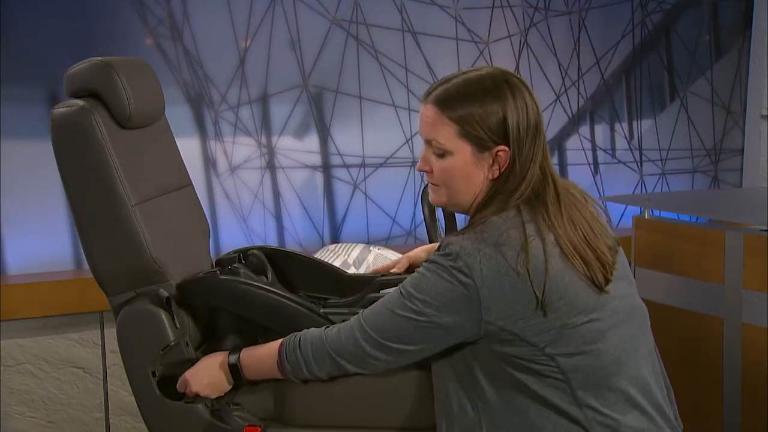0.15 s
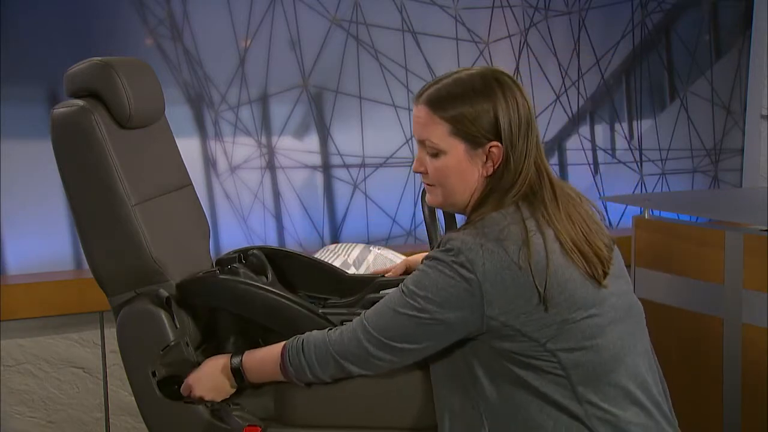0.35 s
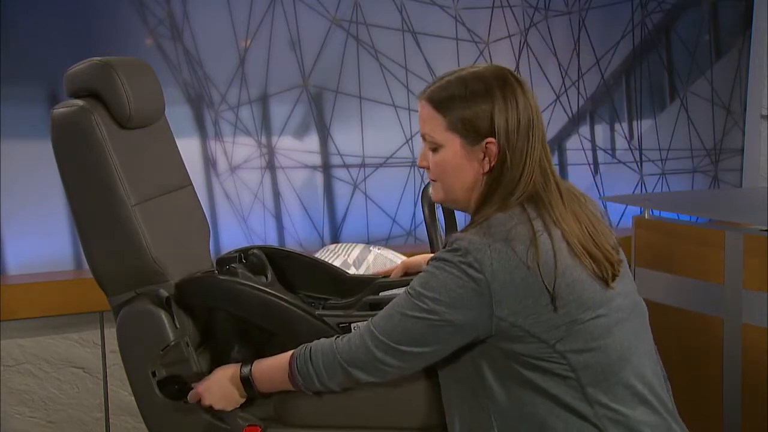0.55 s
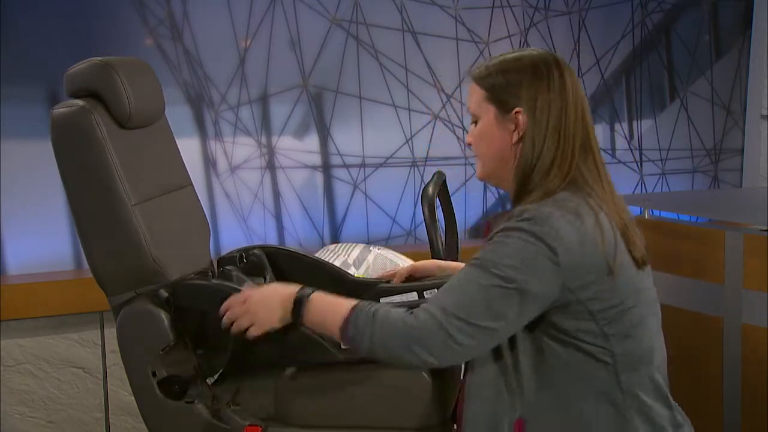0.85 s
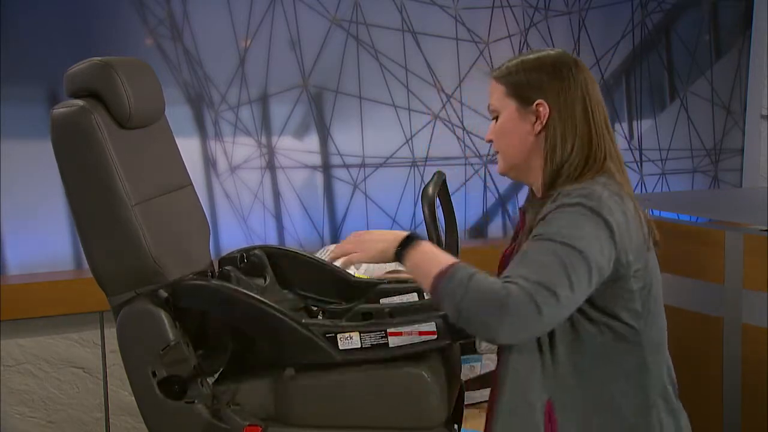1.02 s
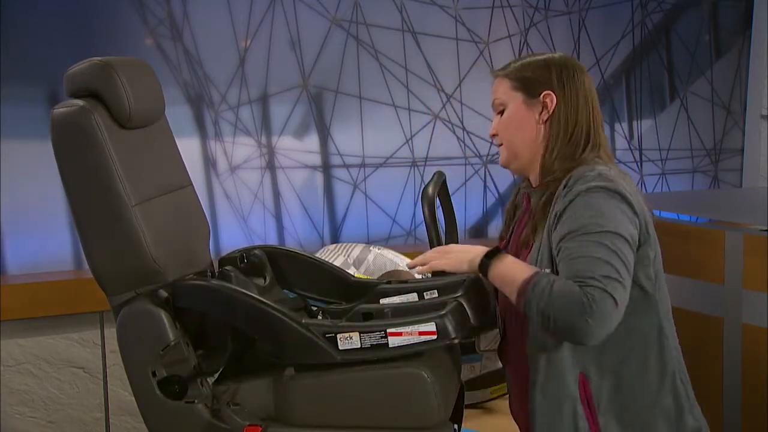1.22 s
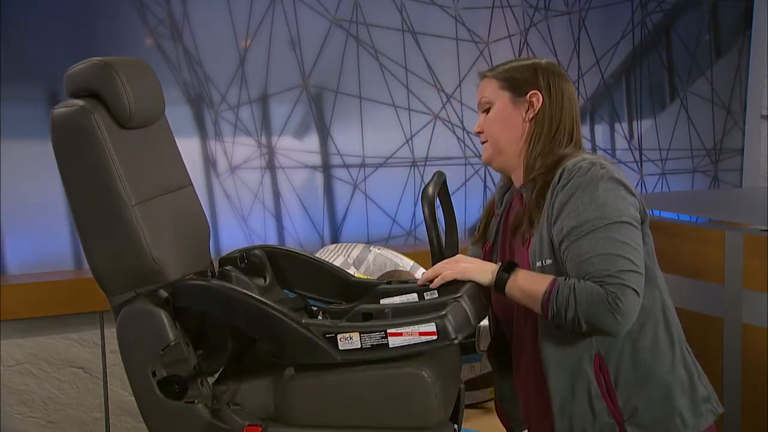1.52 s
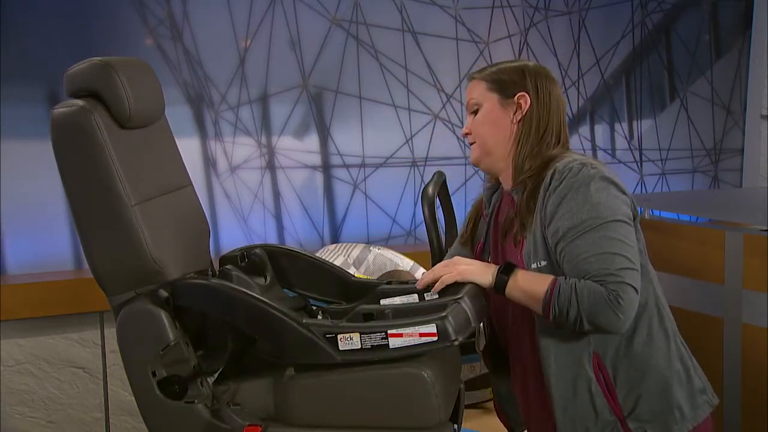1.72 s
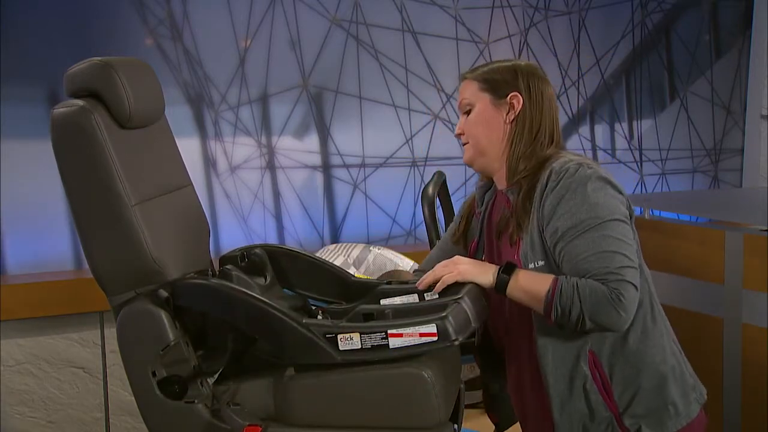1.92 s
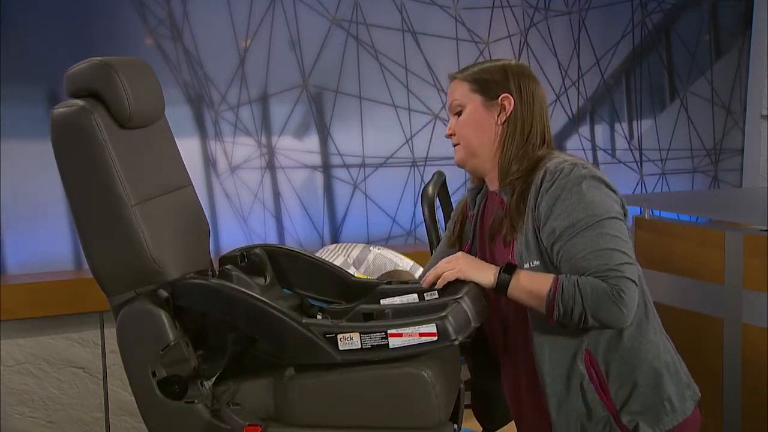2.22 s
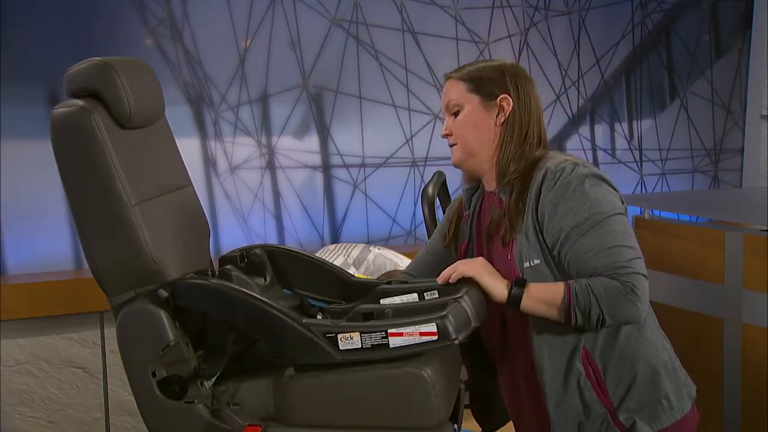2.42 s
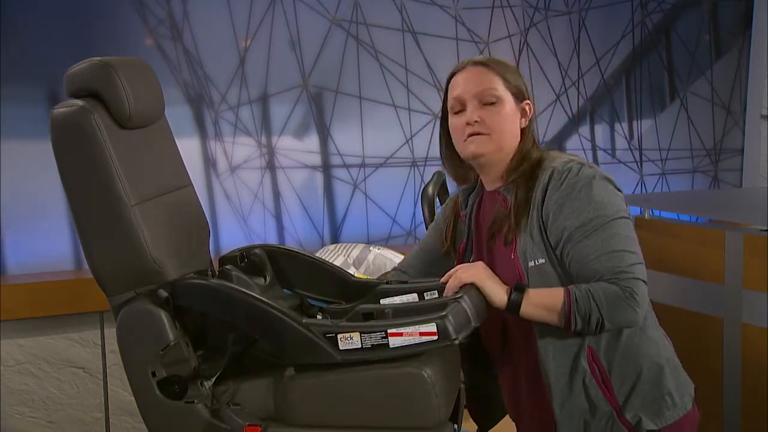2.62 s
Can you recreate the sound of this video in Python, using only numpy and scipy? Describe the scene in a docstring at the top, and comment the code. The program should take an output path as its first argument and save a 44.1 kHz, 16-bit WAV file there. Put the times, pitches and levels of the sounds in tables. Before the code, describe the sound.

A plastic child seat base knocks and clicks while being fitted. Its metal connector scrapes and rattles, then snaps on sharply at 0.4 seconds. A thump and a sleeve rubbing upholstery follow until about 1 second. After a lull, hollow knocks cluster from 1.5 to 1.9 seconds, with a strong one at 2.3. A springy latch clacks twice around 2.5 seconds. Faint ventilation hums in the quiet room.

```python
"""Fitting a child seat base

In a quiet studio a steel connector scrapes into a car seat and snaps onto its anchor, a sleeve
brushes the upholstery, the hollow plastic base knocks as it is shifted, and a sprung latch clacks
twice. Struck parts ring in damped normal modes, sliding friction gives noise, and the room adds
diffuse reverberation, ventilation and a faint hum."""
import sys
import numpy as np
from scipy import signal
from scipy.fft import rfft, irfft
from scipy.io import wavfile
from scipy.ndimage import uniform_filter1d

SR = 44100
rng = np.random.default_rng(int(sys.argv[2]) if len(sys.argv) > 2 else 0)


def wrap_up_sound(samples):
    """Save the sound to the file named by the first command line argument, as 16-bit audio."""
    columns = np.atleast_2d(samples).T
    # keep every value between -1 and 1, then stretch to whole-number steps
    tamed = np.clip(columns, -1, 1)
    steps = np.round(tamed * 32767).astype(np.int16)
    wavfile.write(sys.argv[1], SR, steps)


N = 121275
TIME = np.arange(N) / SR
RING_TIME = TIME[:SR // 2]

# Strokes of the sleeve. Each row: start and end in seconds, first and last level in dB.
SLEEVE_STROKES = [(-.02, 0.112, -36.5, -39.5), (0.537, 0.733, -55, -43), (0.737, 0.804, -44, -38.5),
                  (0.812, 0.902, -39, -42.5), (1.193, 1.401, -63, -52.5), (1.406, 1.508, -60.5, -65.5),
                  (1.569, 1.651, -45, -63), (1.678, 2.035, -59, -60.5), (2.047, 2.062, -56, -49),
                  (2.276, 2.295, -41, -52.5), (2.566, 2.748, -54.5, -54)]
# Envelopes of the sliding contacts. Each row: time in seconds, level in dB.
DRAG_ENVELOPE = [(0, -34.5), (.08, -32.5), (.125, -36.5), (.145, -40), (.19, -50), (.24, -62), (.32, -50),
                 (.365, -40), (.41, -51), (.45, -72)]
RUB_ENVELOPE = [(.5, -64), (.55, -54.5), (.62, -47.5), (.72, -45), (.82, -37), (.915, -45.5), (.95, -38.5),
                (.985, -65), (1.1, -95.5)]
SHUFFLE_ENVELOPE = [(1.02, -67.5), (1.27, -65), (1.42, -56.5), (1.54, -66), (1.58, -37), (1.645, -57.5),
                    (1.72, -41), (1.86, -56), (1.99, -46.5), (2.08, -51.5), (2.13, -67), (2.25, -87),
                    (2.29, -53), (2.42, -59), (2.49, -38), (2.61, -43.5), (2.75, -60)]
# Judders of the connector in the seat gap. Each row: start in seconds, level in dB.
SLIPS = [(0.05, -28.5), (0.064, -31), (0.075, -23.5), (.094, -24), (.114, -29.5)]
# Knocks heard from the base; the one at 1.694 s is the floor or wall echo of the knock just before.
# Each row: start in seconds, thud level in dB and pitch in Hz, panel level in dB and pitch in Hz,
# crack level in dB.
KNOCKS = [(0.0396, -21, 289, -19, 613, -24.5), (0.173, -34, 260, -34, 770, -40.5),
          (.192, -54, 270, -41, 810, -51), (0.2645, -33, 267, -33, 675, -48.5),
          (.283, -34.5, 297, -38.5, 900, -41.5), (0.304, -39, 268, -33.5, 625, -61),
          (.334, -31.5, 245, -28, 694, -39.5), (0.354, -44, 265, -32.5, 1040, -39.5),
          (.6775, -11, 275, -16, 850, -29), (0.742, -25, 290, -50, 910, -31),
          (0.847, -18.5, 166, -28.5, 710, -38.5), (1.382, -28, 210, -45, 716, -56),
          (1.461, -36.5, 284, -39, 790, -51.5), (1.567, -17.5, 209, -29, 660, -49.5),
          (1.592, -24, 201, -31, 635, -52), (1.666, -15.5, 243, -22, 624, -20),
          (1.6696, -8.5, 240, -11.5, 646, -49), (1.694, -17.5, 240, -26, 584, -35),
          (1.756, -26, 267, -28, 630, -51), (1.784, -17.5, 257, -23.5, 694, -41.5),
          (1.8944, -8.5, 273.6, -18, 910, -33), (1.8982, -19.5, 278, -22, 630, -44),
          (2.169, -60, 280, -41, 613, -56.5), (2.2753, -32, 246, -33, 690, -41),
          (2.3115, -10.5, 265, -3, 786, -30.5), (2.4641, -20.5, 243, -16.5, 817, -27),
          (2.4743, -17.5, 227, -18, 704, -45)]
# Impacts of the connector and of the latch. Each row: start in seconds, levels of body, metal ring
# and crack in dB, cutoff of the crack in Hz, level of the push into the cushion in dB.
CONNECTOR_SNAPS = [(.4062, -28.5, -42, -15, 3800, -50), (.4133, -15, -29, -10.5, 15000, -17),
                   (.6545, -37, -67, -28.5, 11000, -53)]
LATCH_CLACKS = [(2.458, -33, -30.5, -25, 15300, -33), (2.5378, -32.5, -22, -19, 11700, -25)]

# Modes of the hollow base and its stiff panels. Each row: pitch ratio, level in dB, T60 in seconds.
THUD_MODES = [(1, 0, .031), (1.62, -11, .022)]
PANEL_MODES = [(.62, -3, 0.0038), (.83, 6.5, 0.0065), (1, 6, 0.011), (1.54, -11.5, 0.024),
               (2.1, -8.5, 0.0046), (2.7, -36, 0.016)]
# Modes of the connector and latch parts. Each row: frequency in Hz, level in dB, T60 in seconds.
SLIP_MODES = [(1290, 2, 0.035), (2470, -7, 0.035)]
HOUSING_MODES = [(283, 4.5, 0.0034), (550, 5.5, 0.011), (760, 4.5, 0.01), (1530, -1.5, 0.016),
                 (3030, -8.5, 0.018), (3540, -7.5, 0.033), (4000, -2, 0.034)]
STEEL_MODES = [(4095, -15, .28), (7850, -14, .3), (8950, -13, .33), (10680, -15, .15), (13650, -12, .13),
               (14100, -6, .16), (14520, -5, .17), (14950, -6, .18)]
LEVER_MODES = [(1203, 5, 0.094), (1450, -2.5, 0.25), (1520, 2, 0.21), (1690, -6, 0.11), (3150, -18, 0.12),
               (4100, -11, 0.06), (6900, -6, .05)]
SPRING_MODES = [(7854, -11, .13), (7975, -5, .09), (8790, -17, .05), (11400, -16, .07), (13450, -14, .05)]

# Spectra of the noises and the reverberation. Each row: frequency in Hz, relative level in dB.
AIR_SPECTRUM = [(20, -22.5), (63, -6), (106, -3), (184, -10), (347, -23), (444, -12.5), (520, -40),
                (1580, -33.5), (11000, -39.5), (16000, -54)]
CLOTH_SPECTRUM = [(50, 19), (300, 12), (900, 2.5), (2000, 6), (4000, 2.5), (7000, 0.5), (11500, -1.5),
                  (16000, -7.5)]
DRAG_SPECTRUM = [(30, -8.5), (130, 0.5), (300, -7.5), (700, -3.5), (1000, -10.5), (1800, -15),
                 (3500, -28.5), (7000, -34.5), (16000, -40)]
RUB_SPECTRUM = [(50, -42), (180, -5), (550, 0.5), (900, 4.5), (1500, -3.5), (3500, -20.5), (12000, -25)]
SHUFFLE_SPECTRUM = [(40, -20.5), (140, -0.5), (260, -7.5), (480, -6), (720, -8.5), (1300, -15.5),
                    (3000, -29.5), (12000, -40.5)]
PLASTIC_SPECTRUM = [(300, -8.5), (1100, 1.5), (1900, 4), (3300, -8), (4400, -5.5), (6000, -15),
                    (11000, -19.5), (16000, -32.5)]
SNAP_SPECTRUM = [(300, -3), (1600, -3), (3500, -3.5), (6000, -13), (8000, -2.5), (11000, -6), (14500, -2.5),
                 (16000, 3)]
LATCH_SPECTRUM = [(200, -8), (1400, 6), (3500, 2.5), (5500, -4), (8000, -1), (10000, -11), (13500, -5),
                  (16000, -18)]
ROOM_SPECTRUM = [(60, -7), (270, -13), (800, -16), (1150, -15.5), (2000, -13.5), (5000, -12),
                 (14000, -10.5)]
# Reverberation time of the studio. Each row: frequency in Hz, T60 in seconds.
ROOM_T60 = [(150, .42), (400, .35), (1000, .36), (3000, .42), (8000, .38), (15000, .28)]


def from_db(db):
    """Amplitude grows tenfold for every 20 dB."""
    return 10 ** (np.asarray(db) / 20)


def unit_rms(x):
    """Normalisation to unit mean power."""
    return x / np.sqrt(np.mean(x ** 2) + 1e-20)


def at_hz(points, hz):
    """Interpolation on a logarithmic frequency axis."""
    freqs, values = np.transpose(points)
    return np.interp(np.log(np.maximum(hz, 1)), np.log(freqs), values)


def envelope(points):
    """Gain over time, linear in dB between points."""
    return from_db(np.interp(TIME, *np.transpose(points)))


def filtered(x, kind, hz):
    """A Butterworth filter with skirts of 12 dB per octave."""
    return signal.sosfilt(signal.butter(2, hz, kind, fs=SR, output="sos"), x)


def noise(spectrum, size=N):
    """Spectral shaping colours white noise; the result has unit rms."""
    gain = from_db(at_hz(spectrum, np.fft.rfftfreq(size, 1 / SR)))
    return unit_rms(irfft(rfft(rng.standard_normal(size)) * gain, size))


def add(out, start, sound):
    """Superposition: a sound joins the mix at its start in seconds."""
    i = max(0, int(start * SR))
    out[i:i + len(sound)] += sound[:N - i]


def ventilation():
    """Steady broadband air noise lies under a pure-tone hum."""
    hum_hz = 124.5
    return from_db(-56.5) * noise(AIR_SPECTRUM) + from_db(-64.5) * np.sin(2 * np.pi * hum_hz * TIME)


def grain(depth_db=1.5, grain_s=0.0011):
    """Friction is uneven, so its amplitude flutters at random."""
    flutter = uniform_filter1d(rng.standard_normal(N), int(grain_s * SR))
    return from_db(depth_db * unit_rms(flutter))


def sleeve_brushes(attack_s=0.0026, release_s=0.012):
    """Friction of fabric on fabric gives bright noise for the length of each stroke."""
    strokes = np.zeros(N)
    for start, end, first_db, last_db in SLEEVE_STROKES:
        attack = np.clip((TIME - start) / attack_s, 0, 1)
        release = np.exp(-np.maximum(TIME - end, 0) / release_s)
        strokes += attack * release * envelope([(start, first_db), (end, last_db)])
    return strokes * noise(CLOTH_SPECTRUM) * grain()


def connector_drag():
    """Sliding friction in the seat gap gives a low scraping noise."""
    return envelope(DRAG_ENVELOPE) * noise(DRAG_SPECTRUM)


def ring(modes, pitch=1, bend=0, relax_s=0.0028):
    """Free vibration is a sum of damped modes; a pressed shell starts sharp by the fraction bend."""
    t = RING_TIME
    bent_time = t + bend * relax_s * (1 - np.exp(-t / relax_s))
    return sum((-1) ** k * from_db(db - 60 * t / t60) * np.sin(2 * np.pi * hz * pitch * bent_time)
               for k, (hz, db, t60) in enumerate(modes))


def crack(spectrum, t60):
    """A hard contact excites modes so dense that they merge into decaying noise."""
    return noise(spectrum, len(RING_TIME)) * from_db(-60 * RING_TIME / t60)


def cushion(db, hz=45, t60=0.036):
    """The soft seat answers a blow as a low, heavily damped oscillator."""
    return ring([(hz, db, t60)])


def base_knocks(rise_s=0.0016):
    """An impact excites panel, crack and cushion at once; the hollow base takes a moment to swing."""
    out, thuds = np.zeros(N), np.zeros(N)
    swing = 1 - np.exp(-RING_TIME / rise_s)
    for start, thud_db, thud_hz, panel_db, panel_hz, crack_db in KNOCKS:
        contact = from_db(crack_db) * crack(PLASTIC_SPECTRUM, t60=0.023)
        panel = from_db(panel_db) * ring(PANEL_MODES, panel_hz)
        add(out, start, contact - panel + cushion(thud_db - 22))
        add(thuds, start, from_db(thud_db) * swing * ring(THUD_MODES, thud_hz, bend=0.17))
    return out + filtered(thuds, "high", hz=146)


def jangle(modes, spread, partials=12):
    """Modes of loose metal split into close partials that beat; spread is a fraction of the pitch."""
    t, out = RING_TIME, 0
    for hz, db, t60 in modes:
        split_hz = hz * (1 + spread * rng.standard_normal((partials, 1)))
        phase = rng.random((partials, 1))
        decay = from_db(-60 * t / t60)
        cluster = decay * np.sin(2 * np.pi * (split_hz * t + phase)).sum(0)
        single_mode_rms = np.sqrt(np.mean(decay ** 2) / 2)
        out = out + from_db(db) * single_mode_rms * unit_rms(cluster)
    return out


def connector_slips():
    """Stick-slip motion: each slip sets the connector ringing briefly."""
    out = np.zeros(N)
    for start, db in SLIPS:
        add(out, start, from_db(db) * jangle(SLIP_MODES, spread=0.039))
    return out


def sprung_catch(hits, body_modes, metal_modes, spread, crack_spectrum, crack_t60):
    """A catch rings on impact and chatters in weakening rebounds; glancing contacts are duller."""
    contacts, bounce_s, loss_db = 3, 0.0016, 5
    out = np.zeros(N)
    for start, body_db, metal_db, crack_db, cutoff_hz, push_db in hits:
        body = from_db(body_db) * ring(body_modes)
        metal = from_db(metal_db) * jangle(metal_modes, spread)
        add(out, start, body + metal - cushion(push_db))
        for k in range(contacts):
            burst = filtered(crack(crack_spectrum, crack_t60), "low", cutoff_hz)
            add(out, start + k * bounce_s, from_db(crack_db - k * loss_db) * burst)
    return out


def connector_snaps():
    """Impact on the anchor excites a well-damped housing and lightly damped steel."""
    return sprung_catch(CONNECTOR_SNAPS, HOUSING_MODES, STEEL_MODES, spread=0.0093,
                        crack_spectrum=SNAP_SPECTRUM, crack_t60=0.032)


def forearm_rub():
    """Sliding friction of the forearm on upholstery gives midrange noise."""
    return envelope(RUB_ENVELOPE) * noise(RUB_SPECTRUM)


def base_shuffle():
    """Friction of the base shifting on the cushion gives dull noise."""
    return envelope(SHUFFLE_ENVELOPE) * noise(SHUFFLE_SPECTRUM)


def latch_clacks():
    """Each impact excites the modes of the lever and the higher ones of its spring."""
    return sprung_catch(LATCH_CLACKS, LEVER_MODES, SPRING_MODES, spread=0.0055,
                        crack_spectrum=LATCH_SPECTRUM, crack_t60=0.025)


def reverberation(x, delay_s=0.0058, build_s=0.0032):
    """A diffuse field decays exponentially, at its own rate in each octave."""
    t, tail = RING_TIME, 0
    edges_hz = np.geomspace(60, 16000, 9)
    for low, high in zip(edges_hz, edges_hz[1:]):
        band = filtered(rng.standard_normal(len(t)), "band", [low, high])
        t60 = at_hz(ROOM_T60, np.sqrt(low * high))
        tail = tail + band * from_db(-60 * t / t60)
    spectrum, hz = rfft(tail), np.fft.rfftfreq(len(t), 1 / SR)
    even = spectrum / np.sqrt(uniform_filter1d(np.abs(spectrum) ** 2, size=15))  # no single note booms
    tail = irfft(even * from_db(at_hz(ROOM_SPECTRUM, hz)), len(t))
    build = np.clip((t - delay_s) / build_s, 0, 1)
    fade = np.clip(2 - 2 * t / t[-1], 0, 1) ** 2
    return signal.fftconvolve(x, tail * build * fade)[:N]


def scene():
    """Direct and reverberant sound add; blows and friction each drive the room at their own level."""
    knocks, snaps, clacks = base_knocks(), connector_snaps(), latch_clacks()
    scraping = (connector_drag() + forearm_rub()) * grain() + connector_slips()
    friction = filtered(scraping + sleeve_brushes(), "high", hz=90)
    room = reverberation(from_db(4) * knocks + from_db(-3.5) * snaps + from_db(7) * clacks
                         + from_db(-4.5) * friction)
    return (knocks + snaps + clacks + friction + room + base_shuffle() + ventilation())[None]


def record(dry):
    """A steep elliptic low-pass filter limits the bandwidth."""
    cutoff_hz = 15350
    return signal.sosfilt(signal.ellip(10, .1, 80, cutoff_hz, fs=SR, output="sos"), dry)


dry = scene()
out = record(dry)
wrap_up_sound(out)
```